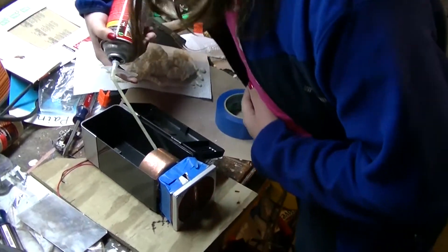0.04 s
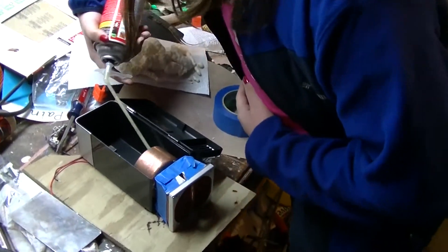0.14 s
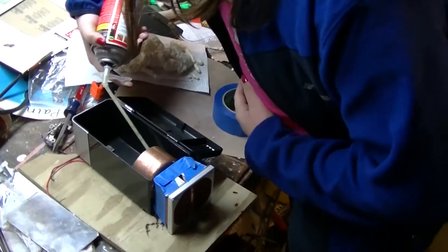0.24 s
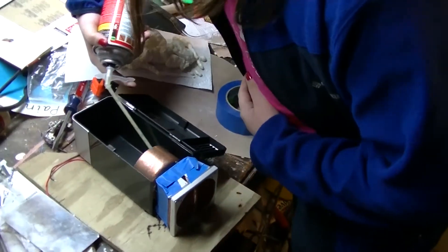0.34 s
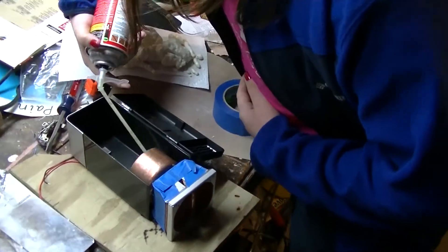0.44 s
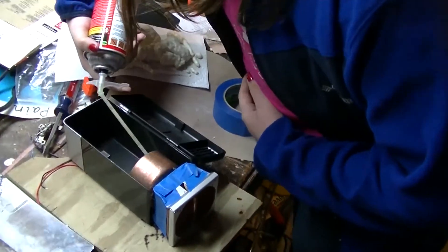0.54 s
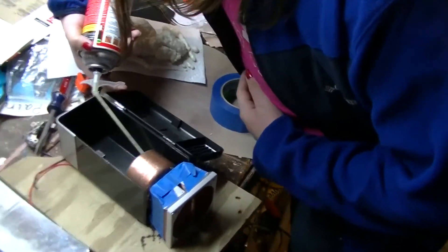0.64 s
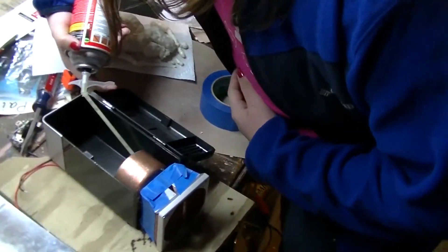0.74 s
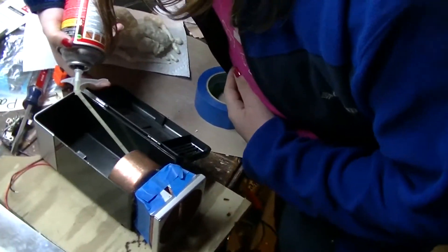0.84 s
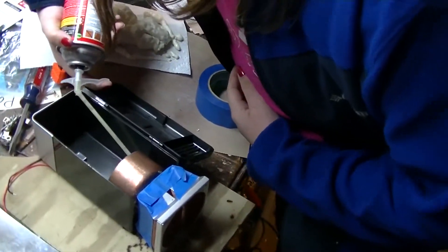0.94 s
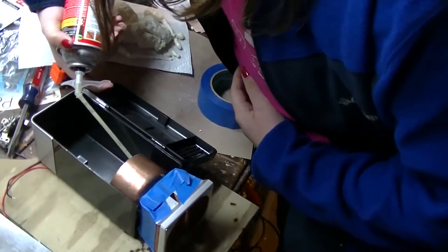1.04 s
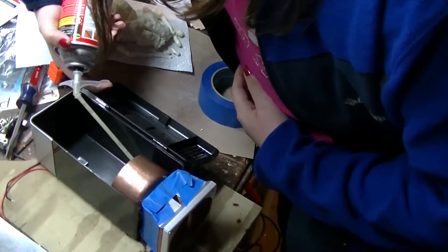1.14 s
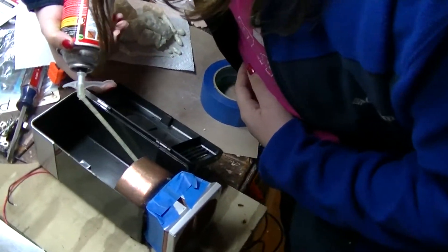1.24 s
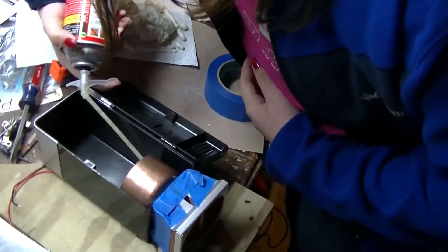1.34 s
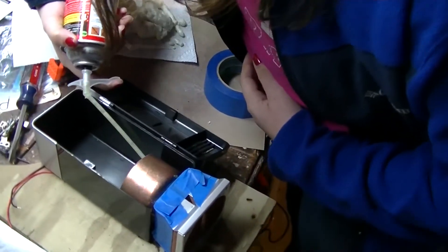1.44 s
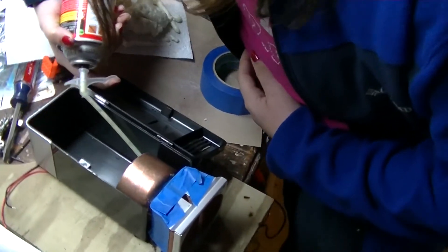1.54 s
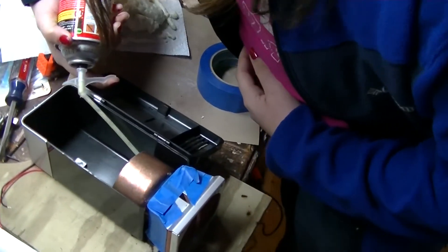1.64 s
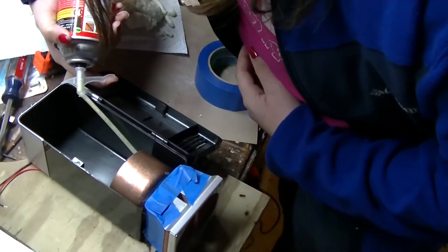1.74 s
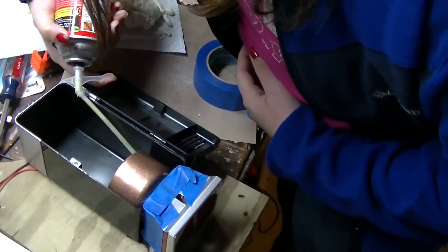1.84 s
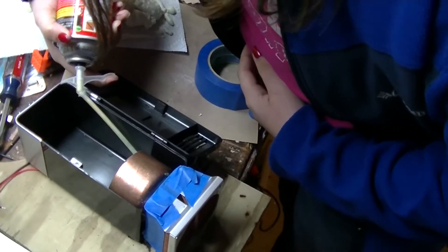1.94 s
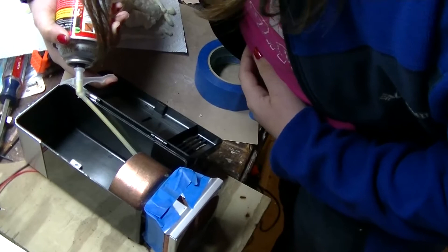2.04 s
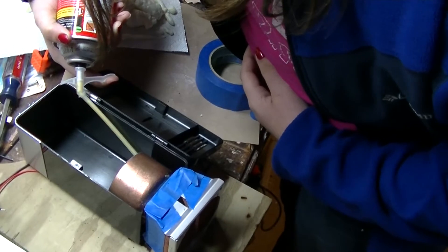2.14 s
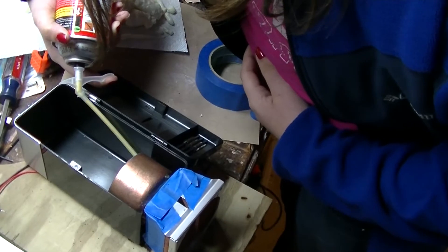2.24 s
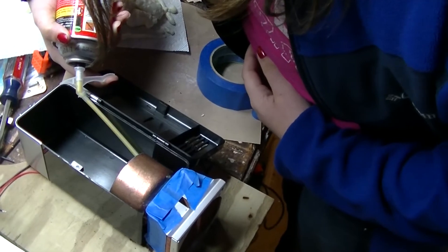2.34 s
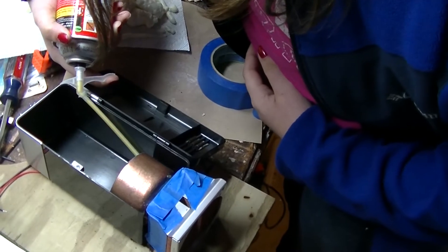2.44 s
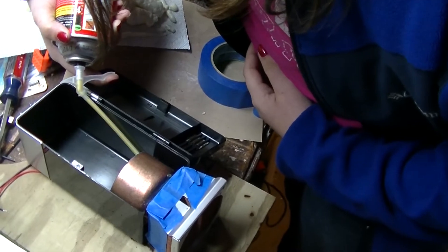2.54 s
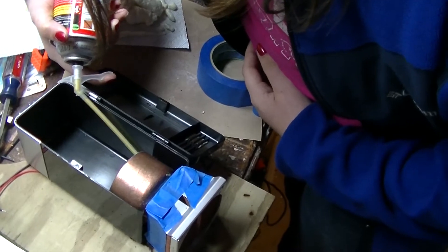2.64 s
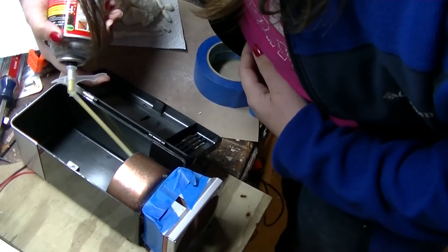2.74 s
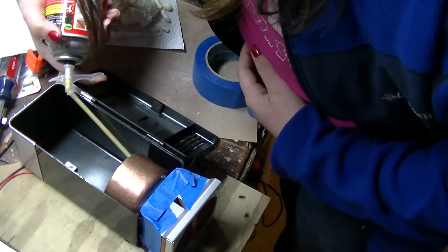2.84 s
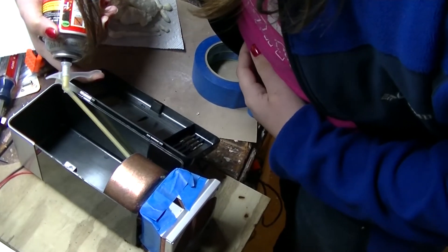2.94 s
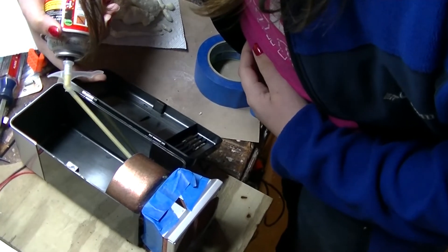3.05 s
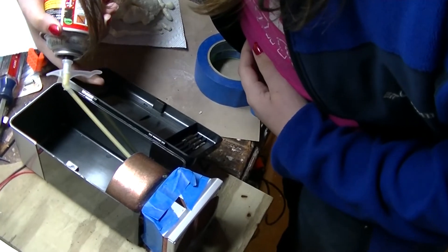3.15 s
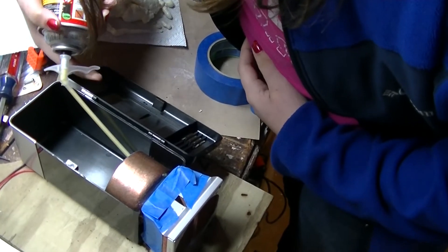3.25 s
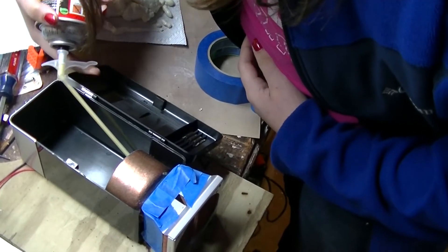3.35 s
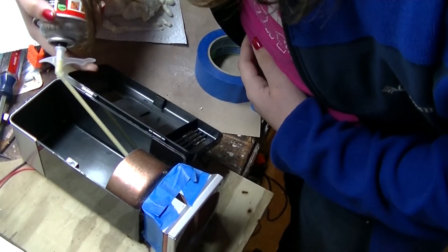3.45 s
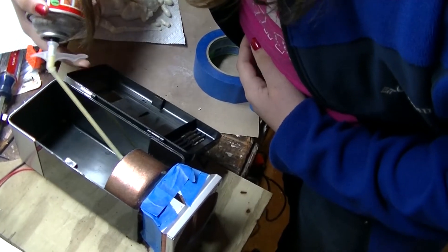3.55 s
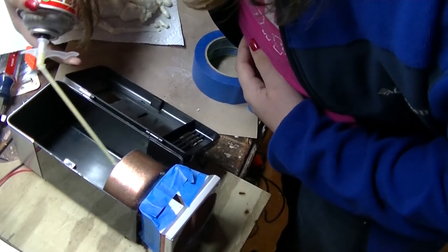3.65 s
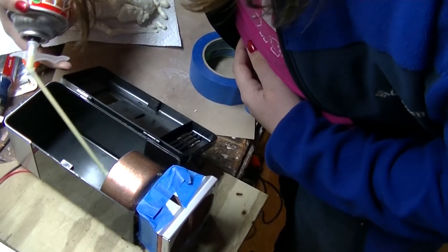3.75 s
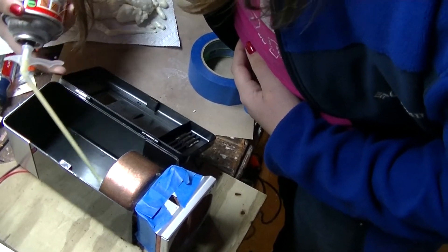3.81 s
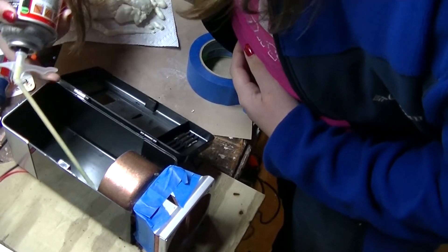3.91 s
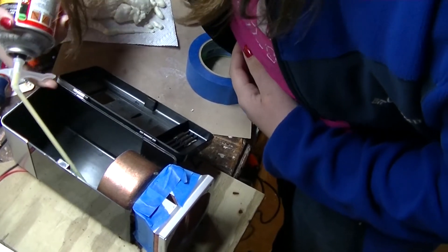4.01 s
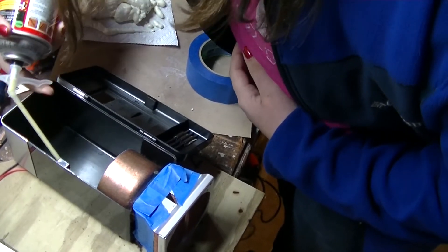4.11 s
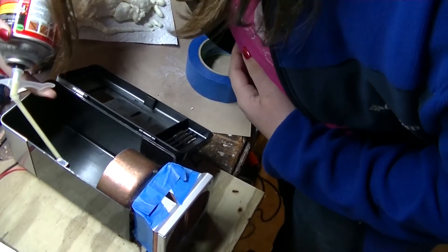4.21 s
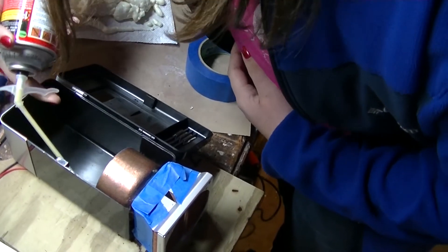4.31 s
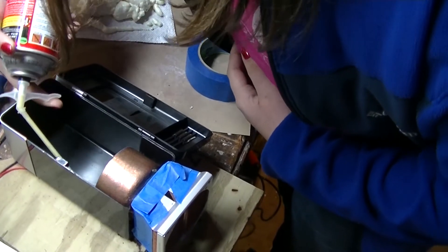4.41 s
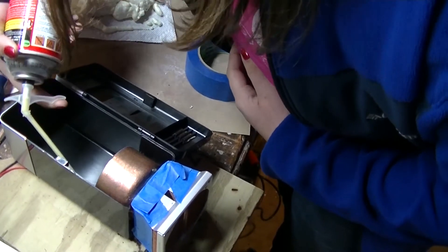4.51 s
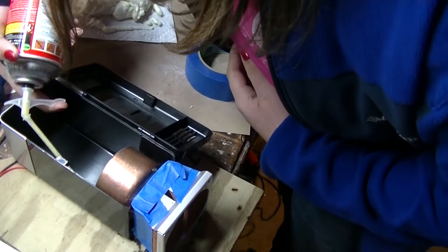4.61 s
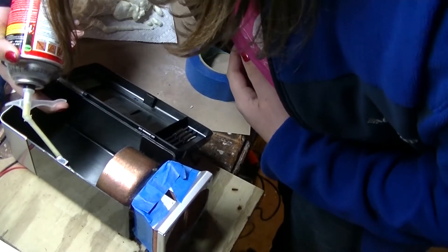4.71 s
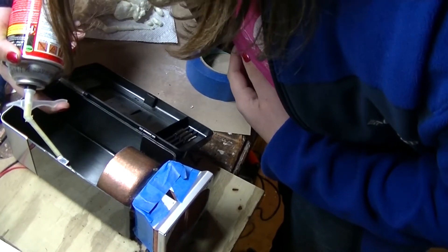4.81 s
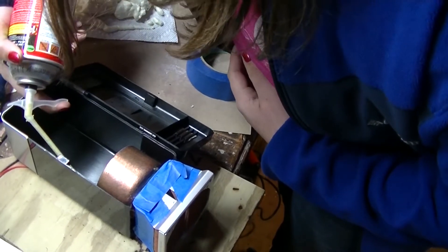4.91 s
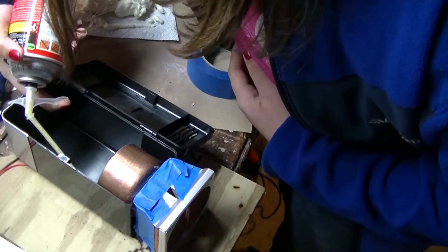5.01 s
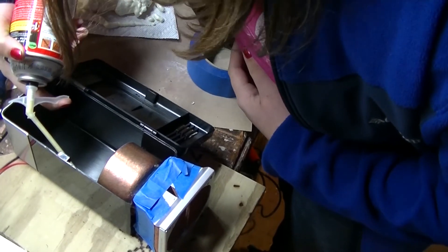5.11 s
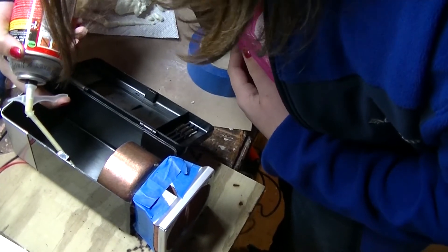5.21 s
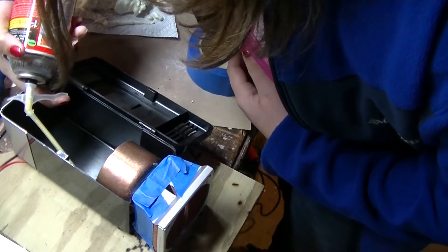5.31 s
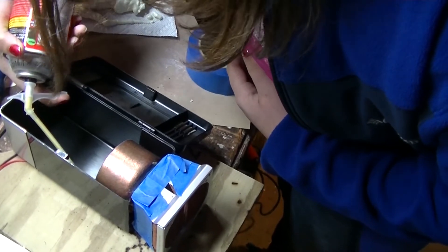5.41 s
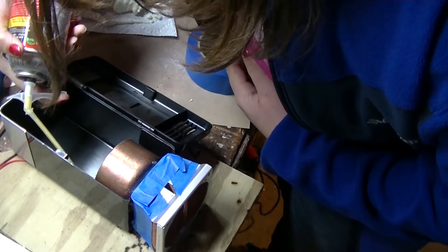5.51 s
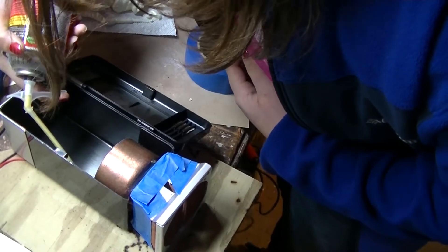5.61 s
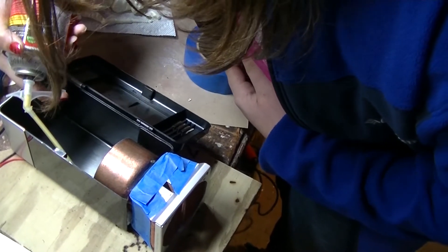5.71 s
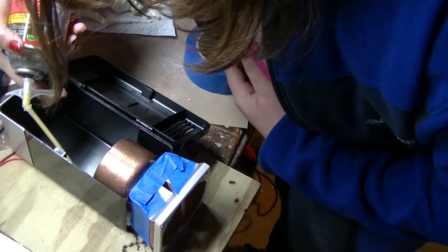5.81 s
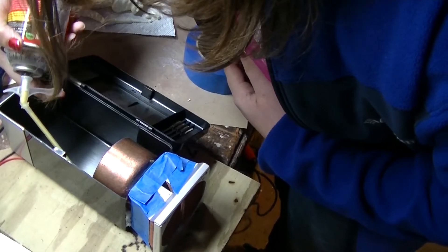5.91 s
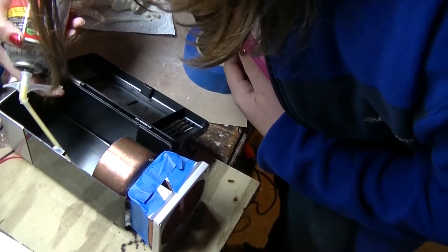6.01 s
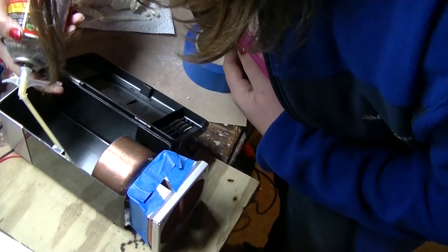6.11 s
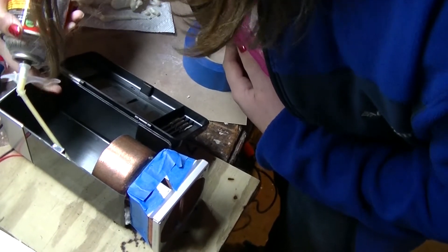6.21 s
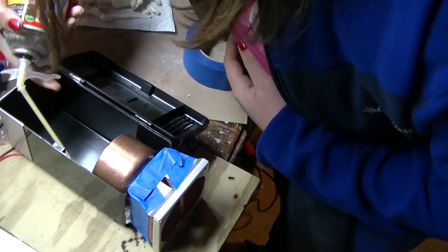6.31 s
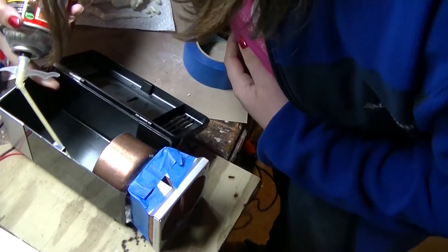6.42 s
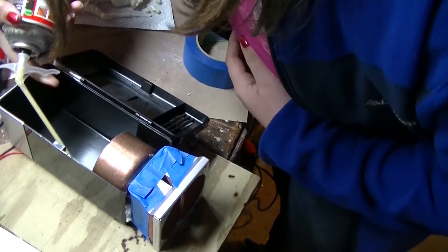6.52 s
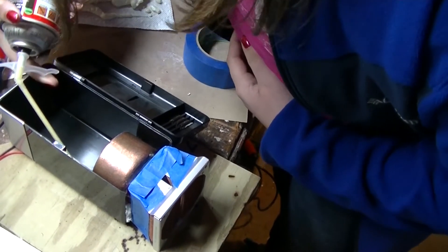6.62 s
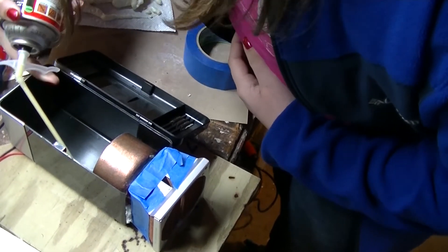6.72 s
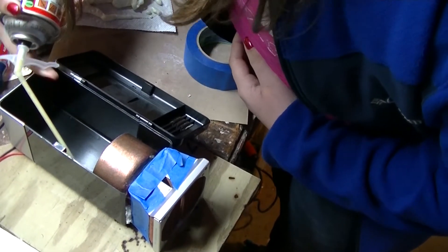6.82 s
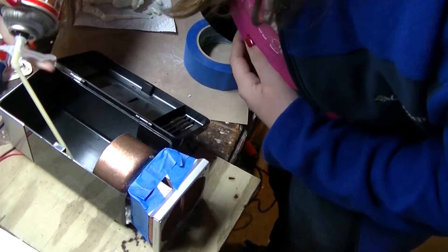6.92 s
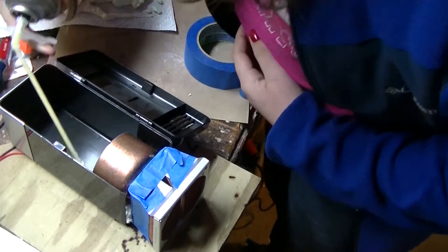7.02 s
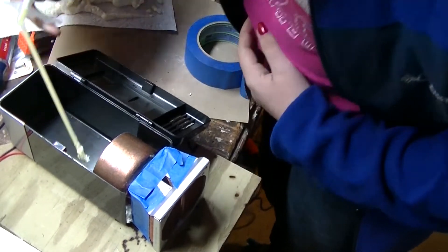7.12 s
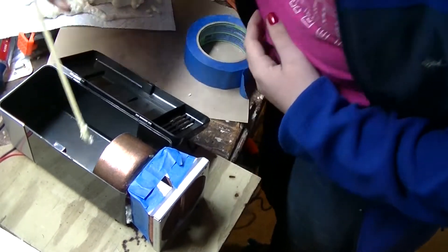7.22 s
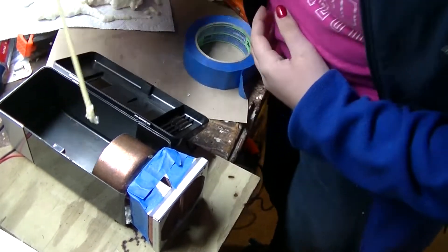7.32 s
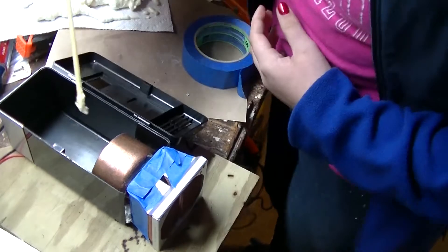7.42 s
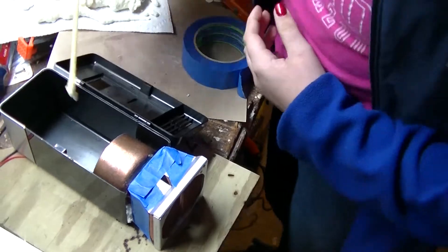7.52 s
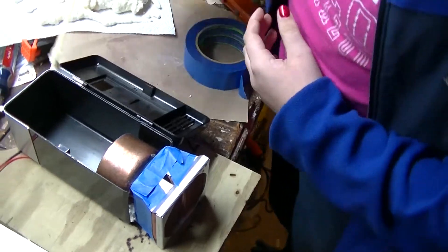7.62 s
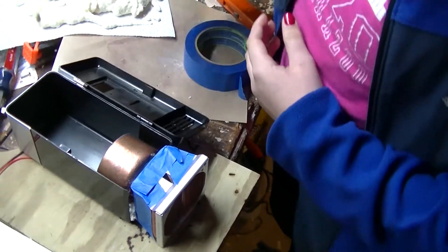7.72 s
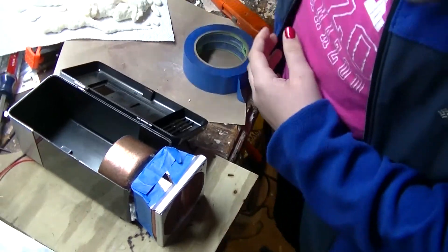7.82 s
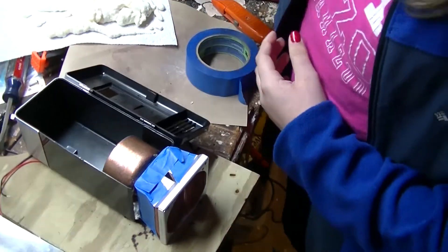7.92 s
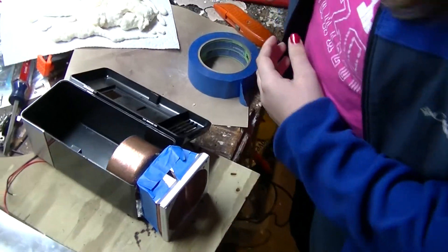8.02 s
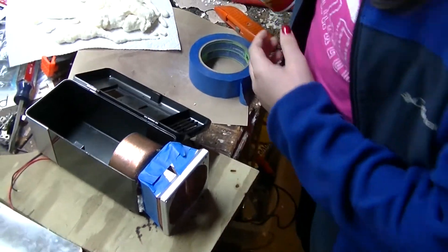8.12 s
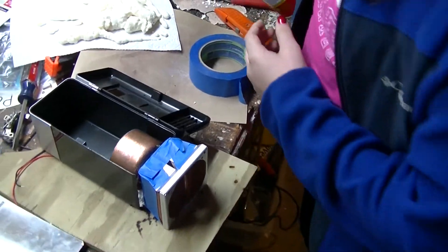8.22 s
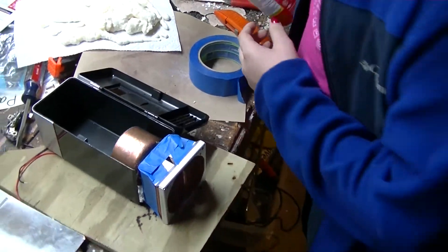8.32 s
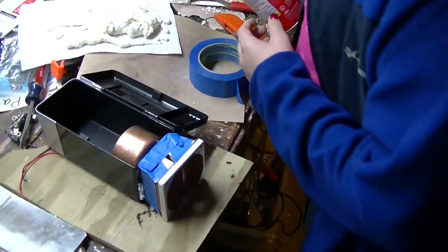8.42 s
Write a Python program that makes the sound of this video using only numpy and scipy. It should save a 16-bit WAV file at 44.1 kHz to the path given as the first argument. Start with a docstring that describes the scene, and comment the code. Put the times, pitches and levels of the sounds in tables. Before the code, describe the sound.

Close at a workbench, a can hisses thinly through a straw, then sputters into a thick, lumpy gush of foam inside an open metal box. After a quiet gap a second, shorter squirt hisses and spits. The straw clicks sharply on the rim, a sleeve rustles and small ticks follow. A hand-held stereo microphone adds faint lens whir, motor ticks, grip bumps and room murmur.

```python
"""Expanding foam is squirted twice from an aerosol can through a straw into an open metal box on a workbench.
Gas hisses first, as coloured noise; then foam spits in short puffs of noise and gushes in a lumpy stream.
The straw clicks on the rim, as ringing tones, a sleeve rustles in clumps of noise and small ticks sound.
A hand-held camera hears it through two ports and adds the whir and ticks of its lens,
bumps of its grip and its own hiss over the murmur of the room."""
import sys
import numpy as np
from scipy import signal
from scipy.fft import rfft, irfft, next_fast_len
from scipy.io import wavfile
from scipy.ndimage import uniform_filter1d

SR = 44100
rng = np.random.default_rng(int(sys.argv[2]) if len(sys.argv) > 2 else 0)


def ratio(d):
    """dB to gain"""
    e = np.asarray(d, float) / 20
    return 10 ** e


def generate_wav(signal):
    """Clip the signal to [-1, 1] and save it as 16-bit WAV at the path in sys.argv[1]."""
    frames = np.transpose(np.atleast_2d(signal))
    scaled = np.clip(frames, -1, 1) * 32767
    pcm = np.round(scaled).astype(np.int16)
    wavfile.write(sys.argv[1], SR, pcm)


N = 372787   # length in samples
SIZE = next_fast_len(N + SR // 4)   # room for filters to ring out
HZ = np.maximum(np.arange(SIZE // 2 + 1) * SR / SIZE, 1)   # frequency grid


def rms_one(x):
    """Scale to unit rms."""
    return x / np.sqrt(np.mean(x ** 2) + 1e-20)


def in_time(rows):
    """Columns of a table joined by straight lines; the level falls silent outside it."""
    s, level_db, *others = np.transpose(rows)
    now = np.arange(N) / SR
    level = ratio(np.interp(now, s, level_db, -140, -140))
    return [level] + [np.interp(now, s, column) for column in others]


def over_hz(points):
    """Columns of a table on the frequency grid, joined along log frequency."""
    hz, *columns = np.transpose(points)
    return [np.interp(np.log(HZ), np.log(hz), column) for column in columns]


def drift(rate):
    """Random wandering of unit rms, with twice `rate` turning points a second."""
    knots = rng.standard_normal(int(N / SR * rate * 2) + 2)
    places = np.linspace(0, len(knots) - 1, N)
    wander = np.interp(places, np.arange(len(knots)), knots)
    return rms_one(uniform_filter1d(wander, size=400))


def bursts(at_s, heights, t60):
    """Envelope of sudden puffs that die away by 60 dB in t60 seconds."""
    out = np.zeros(N)
    for s, height, length in np.broadcast(at_s, heights, t60):
        start = round(s * SR)
        tail = np.arange(min(round(max(length, .002) * SR), N - start))
        rise = np.minimum(tail / 32.3, 1)   # under a millisecond
        out[start:start + len(tail)] += height * rise * ratio(-60 * tail / len(tail))
    return out


def colour(spectrum, rings=(), under_db=0, band_hz=(1, 22050)):
    """Causal (minimum-phase) response of a broad slope plus resonances; white noise gets rms 1 within the band."""
    power = ratio(over_hz(spectrum)[0] + under_db) ** 2
    for hz, width_hz, level_db in rings:
        power += ratio(level_db) ** 2 / (1 + (2 * (HZ - hz) / width_hz) ** 2) ** 1.6
    in_band = (HZ >= band_hz[0]) & (HZ <= band_hz[1])
    power /= np.sum(power[in_band]) / len(HZ)
    # folding the cepstrum forward makes the response start at once
    cepstrum = irfft(np.log(power) / 2, SIZE)
    cepstrum[1:SIZE // 2] *= 2
    cepstrum[SIZE // 2 + 1:] = 0
    return np.exp(rfft(cepstrum))


def modes(table):
    """Response of struck modes; a unit click sets each ringing at its level, neighbours in opposite sense."""
    now = np.arange(SR // 5) / SR
    rings = [ratio(db - 60 * now / t60) * np.sin(2 * np.pi * hz * now) for hz, db, t60 in table]
    return rfft(sum(rings[::2]) - sum(rings[1::2]), SIZE)


# how the two ports hear a direction: f/Hz, left over right level/dB, left's lead/rad, likeness (0-1)
FROM_BOX = [(200, -10, .4, .8), (500, -12, .5, .95), (1000, -9, .8, .98), (1400, -7, .8, .96),
            (2000, -3, .6, .92), (2900, -3, .25, .9), (3400, -3, .45, .88), (4100, -6, .35, .9),
            (4800, -1, .45, .85), (5500, -3, .3, .35), (6200, 6, -.4, .8), (7200, -1, -1.1, .65),
            (8300, -10, -.3, .55), (9600, -9, .1, .65), (11000, -7, .8, .3), (14500, -2, 2.4, .4)]
FROM_HANDS = [(150, -4, .4, .8), (500, -3, .8, .8), (900, 2, .9, .9), (1900, 5, .9, .8), (2500, 4, 1.7, .5),
              (3400, -1, 1.0, .4), (4800, -4, .1, .7), (7000, 1, -.8, .3), (10000, -4, -.1, .3)]
ALL_ROUND = [(60, -12, 13, 0.54), (203, -7, 2.5, 0.091), (508, -3.5, 2, 0.9), (1510, -7, 13, 0.86),
             (2980, -3, 0.8, 0.26), (4800, 0, 1.5, .45), (7000, -1, 1.5, .1), (14000, -1.5, -42, .1)]


def heard(envelope, response, direction, noisy=True):
    """Noise under the envelope (or bare clicks), filtered; ports get shared and own parts; mid level is kept."""
    balance_db, lead, alike = over_hz(direction)
    alike = np.clip(alike, 0, 1) if noisy else 1
    left, right = ratio(balance_db / 2), ratio(-balance_db / 2)
    mid = np.sqrt(left ** 2 + right ** 2 + 2 * alike * left * right * np.cos(lead)) / 2
    source = rng.standard_normal((3, N)) if noisy else np.ones((3, N))
    shared, *own = rfft(envelope * source, SIZE)
    turned = shared * np.exp(np.outer([.5j, -.5j], lead))
    ports = np.sqrt(alike) * turned + np.sqrt(1 - alike) * np.array(own)
    return irfft(ports * [left, right] / mid * response, SIZE)[:, :N]


def tilted(x, extra_db, edge_hz, kind):
    """Raise or lower one end of the spectrum over time."""
    end = signal.sosfiltfilt(signal.butter(2, edge_hz, kind, fs=SR, output="sos"), x)
    return x + (ratio(extra_db) - 1) * end


def patchy(x, spread_db, rate):
    """A source that keeps changing shape: overlapping half-octave bands swell and sink on their own."""
    spectrum = rfft(x, SIZE)
    step = np.clip(2 * np.log2(HZ / 700), 0, 8)
    out = 0
    for k in range(9):
        band = irfft(spectrum * np.maximum(1 - abs(step - k), 0), SIZE)[:, :N]
        out = out + band * rms_one(ratio(spread_db * drift(rate)))
    return out


# colour of the steady background: f/Hz, level/dB
ROOM_COLOUR = [(15, -59), (25, -63), (120, -17.5), (170, -17.5), (263, -3), (301, -6), (405, -9.5),
               (531, -24), (1260, -25), (1400, -23), (1610, -40), (1790, -22), (2280, -20.5), (3720, -17.5),
               (16000, -32)]
ROOM_DB = -63   # level at 200-450 Hz


def room():
    """Murmur of the room air and the camera's own hiss: noise whose level wavers slightly."""
    return heard(ratio(ROOM_DB + 1.0 * drift(18)), colour(ROOM_COLOUR, band_hz=(200, 450)), ALL_ROUND)


# single bumps as the grip shifts on the camera: t/s, level/dB
BUMPS = [(0.302, -47), (0.364, -46), (0.399, -52), (0.419, -48), (0.459, -46), (0.499, -46), (0.559, -48),
         (0.959, -52), (1.009, -47), (1.1, -49), (1.176, -54), (1.199, -46), (1.239, -49), (1.259, -45),
         (3.189, -51), (6.039, -50), (6.549, -52), (7.099, -45), (7.249, -54), (7.37, -44), (7.449, -42.5),
         (7.569, -49), (8.179, -43), (8.259, -51), (8.349, -45), (8.379, -44), (8.419, -46)]
# dull colour of the grip noise: f/Hz, level/dB
GRIP_COLOUR = [(25, -28), (60, -10.5), (130, -1.5), (250, -1.5), (500, -7.5), (1000, -59)]
GRIP_DB, SQUEEZE_DB, SQUEEZE_S = -74, -2, 0.34   # resting rumble; swell of pressure around bumps and its length


def grip():
    """Lumpy low rumble through the camera body that swells around a few dull bumps, each one short push."""
    s, peak_db = np.transpose(BUMPS)
    bumps = bursts(s, ratio(peak_db), 0.011)
    squeeze = ratio(SQUEEZE_DB) * np.sqrt(np.abs(uniform_filter1d(bumps ** 2, round(SQUEEZE_S * SR))))
    lumps = rms_one(ratio(2.0 * drift(25)))
    pressure = np.hypot(ratio(GRIP_DB + 2.0 * drift(2.5)), squeeze) * lumps
    response = colour(GRIP_COLOUR, band_hz=(40, 220))
    rumble = heard(pressure, response, FROM_HANDS)
    return rumble + heard(bumps, 3.3 * response / abs(response).max(), FROM_HANDS, noisy=False)


def rustle(level, spectrum, clump_db, rings=()):
    """Fibres and small parts slip in clumps: noise whose level jumps about."""
    clumps = rms_one(ratio(clump_db * drift(100)))
    return heard(level * clumps, colour(spectrum, rings, band_hz=(1200, 6000)), FROM_HANDS)


# lens whir and faint movement, running throughout: t/s, level/dB (at 1.2-6 kHz)
WHIR = [(0, -57), (.55, -59.5), (.75, -62), (3.8, -64.5), (4.2, -67.5), (4.5, -63), (4.8, -68), (6.3, -60),
        (6.6, -60.5), (6.75, -71.5), (7.0, -63.5), (7.3, -59.5), (8.2, -60.5), (8.46, -60.5)]
# its colour: f/Hz, level/dB
WHIR_COLOUR = [(290, -31.5), (500, -5.5), (985, -6.5), (1870, -3.5), (2430, -3.5), (3930, -3), (4140, -5),
               (5060, -3), (5550, -11.5), (9960, -16), (12000, -36), (15600, -46), (22000, -120)]


def whir():
    """The lens whir and faint movement, made as one soft rustle that rises and falls."""
    return rustle(in_time(WHIR)[0], WHIR_COLOUR, clump_db=2.1)


# firm steps of the lens motor: t/s, level/dB
STEPS = [(0.019, -64), (0.1206, -65), (0.2633, -58), (0.3303, -57), (0.397, -60.5), (0.5881, -63),
         (0.662, -60), (0.722, -67), (3.5213, -48.5), (3.6638, -57), (3.7312, -58), (3.833, -65),
         (3.9998, -55), (6.2232, -46.5), (6.302, -56), (6.6364, -58.5), (7.4255, -47), (7.5035, -57),
         (7.5702, -56.5), (7.6627, -66), (7.7612, -59), (7.8375, -57)]
# spells of faint stepping: start t/s, end t/s, highest level/dB
HUNTING = [(0.289, .53, -66), (3.556, 3.97, -62), (6.262, 6.601, -67)]
# ringing of the camera shell: f/Hz, level/dB, time to fall 60 dB/s
SHELL = [(1440, 0, .016), (1830, -1, .012), (2450, -2, .01), (2900, -5, .02), (3300, -3, .008),
         (3900, -4, .008), (4950, -10, .01)]
STEP_S = .0335   # beat of the faint steps


def lens_steps():
    """Each step is a few milliseconds of rough contact inside the shell; faint ones keep a steady beat."""
    s, peak_db = np.transpose(STEPS)
    contact = bursts(s, ratio(peak_db), 0.022)
    for start_s, end_s, faint_db in HUNTING:
        at_s = np.arange(start_s, end_s, STEP_S)
        heights = ratio(faint_db - 13.0 * rng.random(30)[:len(at_s)])
        contact = np.maximum(contact, bursts(at_s, heights, 0.026))
    no_bass = (1j * HZ / (660.0 + 1j * HZ)) ** 3
    return heard(contact, modes(SHELL) * no_bass, FROM_HANDS)


# small bright ticks at the bench: t/s, level/dB, centre f/Hz
TICKS = [(1.094, -28.5, 4050), (3.281, -26.5, 4270), (4.361, -32, 4570), (4.672, -35.5, 3660),
         (7.047, -30, 6640), (7.084, -37, 4500), (7.0942, -21.5, 6350), (7.321, -36.5, 10500),
         (7.628, -36, 10400), (7.651, -38, 10800), (7.92, -44, 10400), (8.041, -42, 2500),
         (8.119, -24.5, 4440), (8.329, -28.5, 2740), (8.392, -25.5, 4330), (8.405, -30, 2000)]


def ticks():
    """Each tick is a puff of noise around its own pitch, a little stronger on the right."""
    out = np.zeros(N)
    for s, peak_db, hz in TICKS:
        # 4 dB more, as the band filter takes some away
        puff = bursts(0, ratio(peak_db + 4), 0.0078)[:1024] * rng.standard_normal(1024)
        edges = [max(hz - 1500, hz * 0.52), hz + 1500]
        start = round(s * SR)
        band = signal.butter(3, edges, "band", fs=SR, output="sos")
        out[start:start + 1024] += signal.sosfilt(band, puff)
    return out * ratio([[-1.5], [1.5]])


DRAG_S, DRAG_DB, CATCH_S, STROKE_S, RELEASE_S = 7.365, -48.5, 0.0063, .3, 0.22
STROKE_SAG_DB, RELEASE_DB = 5.5, 15   # loss along the stroke; rise at the catch and fall at the release


def drag():
    """Level of the sleeve's stroke: a quick catch, a slow sag and a release."""
    s = DRAG_S + np.cumsum([0, CATCH_S, STROKE_S, RELEASE_S])
    level_db = DRAG_DB - np.cumsum([RELEASE_DB, -RELEASE_DB, STROKE_SAG_DB, RELEASE_DB])
    return in_time(np.transpose([s, level_db]))[0]


# broad colour of the sleeve's stroke: f/Hz, level/dB
DRAG_COLOUR = [(180, -29), (300, 4.5), (690, -21), (844, -4), (1100, -10.5), (1470, -4.5), (2690, -9),
               (3890, -6), (7320, -20), (10800, -26), (12000, -32), (15600, -62), (22000, -120)]
# the stroke sets the board under it singing: f/Hz, width f/Hz, level/dB
DRAG_RINGS = [(870, 63, -6), (1170, 23, -6), (1920, 210, -1.5), (2850, 81, -11), (3930, 270, -5),
              (5730, 23, -4)]
DRAG_TREBLE_DB, DRAG_BRIGHTENS_DB = -4.5, 7   # at the catch; gain by the end of the stroke


def sleeve():
    """The stroke starts dull and brightens as it gathers speed."""
    along = np.clip((np.arange(N) / SR - DRAG_S) / STROKE_S, 0, 1)
    cloth = rustle(drag(), DRAG_COLOUR, clump_db=2.0, rings=DRAG_RINGS)
    stroke = patchy(cloth, spread_db=1.0, rate=21.0)
    return tilted(stroke, DRAG_TREBLE_DB + DRAG_BRIGHTENS_DB * along, 2400, "high")


# straw against the rim of the box: t/s, first click level/dB, loss per rebound/dB
KNOCKS = [(7.1006, -24, 2.5), (7.372, -46, 22)]
# ringing of the box: f/Hz, level/dB, time to fall 60 dB/s
BOX = [(377, 5.5, 0.012), (820, -8, 0.088), (1380, -5.5, 0.015), (1810, 2.5, 0.015), (2190, 2, 0.017),
       (3080, 2, 0.019), (3550, 5, 0.0084), (4100, 5, 0.012), (4800, 3, 0.0051), (5300, -3, 0.0092),
       (5840, 2, 0.0065), (7160, -19, 0.0071), (9500, -8, 0.0041)]
REBOUND_S, REBOUND_SLOWS = 0.000794, 1.35   # first gap; each next gap is this many times longer


def knocks():
    """A hard touch and three quick rebounds set every mode of the box ringing."""
    after_s = REBOUND_S * np.cumsum([0, 1, REBOUND_SLOWS, REBOUND_SLOWS ** 2])
    clicks = np.zeros(N)
    for s, peak_db, loss_db in KNOCKS:
        clicks[np.round((s + after_s) * SR).astype(int)] = ratio(peak_db - loss_db * np.arange(4))
    no_bass = (1j * HZ / (220.0 + 1j * HZ)) ** 2
    return heard(clicks, modes(BOX) * no_bass, FROM_HANDS, noisy=False)


# the clearest spits of foam: t/s, level/dB
SPITS = [(1.844, -39), (1.954, -37.5), (2.0014, -40), (2.086, -34), (2.2084, -38), (2.2557, -26),
         (2.2418, -29), (2.275, -29.5), (2.2977, -30.5), (2.3405, -25.5), (2.3632, -30.5), (2.4152, -28.5),
         (2.436, -26.5), (2.468, -24.5), (2.4837, -31), (2.5083, -19), (2.5223, -24), (2.539, -16.5),
         (2.5695, -17), (2.597, -19), (2.692, -19.5), (5.3779, -24.5), (5.47, -34), (5.5162, -25),
         (5.5494, -29), (5.5726, -30), (5.5876, -21), (5.6102, -29), (5.6404, -24), (5.686, -24),
         (5.706, -23.5), (5.7295, -19.5), (5.7954, -17.5), (5.827, -29), (5.9943, -22.5), (6.0463, -30),
         (6.079, -41)]
# smaller random spits, a row for each squirt: start t/s, end t/s, highest level/dB
SPUTTER = [(2.1, 2.42, -32), (5.38, 5.5, -41)]
SPUTTER_PER_S, SPIT_T60_S = 45.0, 0.021


def spits(squirt):
    """Envelope of the clear spits of one squirt and freshly drawn small ones at chance moments."""
    s, peak_db = np.transpose([row for row in SPITS if (row[0] > 4) == squirt])
    clear = bursts(s, ratio(peak_db), SPIT_T60_S)
    start_s, end_s, small_db = SPUTTER[squirt]
    gap, size = rng.random((40, 2)).T
    at_s = start_s - np.cumsum(np.log(gap)) / SPUTTER_PER_S
    heights = ratio(small_db - 6.0 * size)
    small = bursts(at_s[at_s < end_s], heights[at_s < end_s], SPIT_T60_S)
    return np.maximum(clear, small)


# propellant gas through the straw, one table a squirt: t/s, level/dB (at 3.5-7 kHz)
GAS = [
    [(1.07, -69), (1.11, -57.5), (1.25, -52.5), (1.32, -47.5), (1.48, -43.5), (1.65, -45.5), (1.95, -38.5),
     (2.4, -50), (2.56, -36), (3.02, -40.5), (3.14, -58.5), (3.3, -63), (3.62, -69)],
    [(4.84, -78), (4.9, -47.5), (4.96, -44), (5.1, -37), (5.36, -39), (5.62, -52), (5.75, -36.5),
     (5.87, -40), (6.05, -43.5), (6.2, -61), (6.35, -71)],
]
# broad colour of the gas, one table a squirt: f/Hz, level/dB
GAS_COLOUR = [
    [(710, -25), (1200, -19), (2210, -6.5), (2710, -5), (4200, 7.5), (5610, -1.5), (6310, -2.5),
     (7170, -7.5), (15500, -35)],
    [(710, -66), (1200, -28), (3050, -9.5), (3980, 6), (4670, 1.5), (5610, -3.5), (6110, -4), (9990, -23.5),
     (15500, -35)],
]
# resonances of straw and box on it, one table a squirt: f/Hz, width f/Hz, level/dB
GAS_RINGS = [
    [(2400, 300, -5), (3400, 250, -7), (4200, 350, 0), (4900, 300, -6), (6150, 300, -1), (8050, 400, -16),
     (11900, 700, -29), (9700, 900, -21)],
    [(2800, 250, -10), (3430, 200, -2), (3910, 400, 0), (4610, 250, 0), (6180, 400, -9), (7340, 400, -14),
     (8460, 400, -15), (10000, 1200, -20)],
]
# the jet brightens while foam climbs the straw, until the gush; a row for each squirt:
# gush t/s, starting treble level/dB, rise/(dB/s), treble level after/dB
BRIGHTENS = [(2.44, 0, 4.5, -0.5), (5.56, -4, 25.5, -4.5)]
TREBLE_KEEPS = 0.78   # share of each sag in the jet that its treble, straight from the valve, does not follow
SPIT_GAS_DB = -5.5   # puffs of gas against the spits


def gas(squirt):
    """A turbulent jet that flutters as droplets pass the valve; spits free puffs of gas."""
    level, = in_time(GAS[squirt])
    gush_s, start_db, db_per_s, after_db = BRIGHTENS[squirt]
    now = np.arange(N) / SR
    sag_db = 20 * np.log10(np.maximum.accumulate(level) / level)   # below the loudest so far
    rising_db = start_db + db_per_s * (now - GAS[squirt][0][0])
    treble_db = np.where(now < gush_s, rising_db, after_db) + TREBLE_KEEPS * sag_db
    treble_db = uniform_filter1d(np.clip(treble_db, -12, 28.0), size=2000)
    flutter = ratio(0.31 * drift(12) + 0.33 * drift(60) + 1.33 * drift(320))
    jet = np.hypot(level * rms_one(flutter), ratio(SPIT_GAS_DB) * spits(squirt))
    response = colour(GAS_COLOUR[squirt], GAS_RINGS[squirt], under_db=-6.5, band_hz=(3500, 7000))
    return tilted(heard(jet, response, FROM_BOX), treble_db, 9050, "high")


# foam leaving the tip, one table a squirt: t/s, level/dB (at 1.2-3 kHz)
FOAM = [
    [(1.5, -58), (1.95, -56.5), (2.3, -42), (2.41, -49.5), (2.5, -38.5), (2.55, -29.5), (2.66, -21.5),
     (2.76, -26), (2.87, -30), (3.05, -47), (3.14, -63), (3.3, -74)],
    [(5.1, -60), (5.38, -48.5), (5.6, -48.5), (5.66, -35), (5.72, -36), (5.79, -27), (5.88, -30.5),
     (6.06, -35.5), (6.12, -45.5), (6.28, -71)],
]
# broad colour of the foam, one table a squirt: f/Hz, level/dB
FOAM_COLOUR = [
    [(120, -65), (200, -40), (334, -21), (709, -12), (916, -7.5), (1100, -13), (1450, -2.5), (2210, 1.5),
     (4950, -16), (10100, -53), (16000, -64)],
    [(120, -47), (200, -25), (401, -7.5), (500, -11.5), (950, -1.5), (1100, -11), (1270, -4.5), (1980, -11),
     (3490, 1), (10100, -35.5), (16000, -58)],
]
# resonances of straw and box on it, one table a squirt: f/Hz, width f/Hz, level/dB
FOAM_RINGS = [
    [(358, 90, -18), (934, 120, -11.5), (1390, 62, -7.5), (1910, 190, -9.5), (2280, 130, -10),
     (2932, 170, -1.5), (3180, 130, -10), (4000, 160, -17), (5090, 220, -15), (6140, 240, -29)],
    [(349, 82, -8), (947, 73, -10), (1324, 49, -9), (1700, 190, -10.5), (2200, 93, -4), (2595, 530, -2.5),
     (3040, 120, -13), (3590, 83, -9), (5000, 330, -10.5), (6000, 280, -16), (9860, 370, -26)],
]
# the low gurgle of the gush follows it late, a row for each squirt: lag t/s, level/dB
GURGLE = [(0.18, -2.5), (0.093, -5.5)]
# air in the box, pushed by spits: pitch, width, gain at that pitch and length of each push
BOOM_HZ, BOOM_WIDTH_HZ, BOOM_DB, BOOM_S = 338, 136, 13, 0.057


def foam(squirt, per_s=85.0, t60=0.052, lumpy=0.18):
    """Gas pockets burst at the tip in uneven succession over a steady gush; spits push the air in the box."""
    level, = in_time(FOAM[squirt])
    lag_s, gurgle_db = GURGLE[squirt]
    late = uniform_filter1d(np.roll(level, round(lag_s * SR)), size=8000)
    bass_db = np.clip(gurgle_db + 20 * np.log10(late / level), -12.0, 27.0)

    at_s = np.cumsum(rng.gamma(3.0, 1 / 3.0, 2000) / per_s)
    at_s = at_s[at_s < N / SR - .1]
    heights = ratio(2.0 * rng.standard_normal(2000)[:len(at_s)])
    pockets = rms_one(bursts(at_s, heights, t60))
    flow = level * np.sqrt(1 - lumpy + lumpy * pockets ** 2) * rms_one(ratio(2.0 * drift(250)))
    response = colour(FOAM_COLOUR[squirt], FOAM_RINGS[squirt], under_db=-5.5, band_hz=(1200, 3000))
    gush = tilted(heard(flow, response, FROM_BOX), bass_db, 1070, "low")

    thin = HZ ** 2 / (HZ ** 2 + 880.0 ** 2)   # a single spit moves little air: weak bass
    puffs = spits(squirt)
    boom = ratio(BOOM_DB) / (1 + 1j * (HZ / BOOM_HZ - BOOM_HZ / HZ) * BOOM_HZ / BOOM_WIDTH_HZ) ** 2
    pushed = uniform_filter1d(puffs * (bass_db > -6.0), round(BOOM_S * SR))   # only while the gurgle is up
    return gush + heard(puffs, response * thin, FROM_BOX) + heard(pushed, boom, FROM_BOX)


BOX_ECHO_T60_S, BOX_ECHO_DB = .12, -6   # sound bouncing inside the open box; its level against the direct sound


def in_box(x):
    """Dense early echoes between the metal walls leave a fine comb of resonances, weaker in the bass."""
    now = np.arange(SR // 4) / SR
    echoes = rng.standard_normal(len(now)) * ratio(-60 * now / BOX_ECHO_T60_S) * (now > .001)
    echoes = echoes / np.sqrt(np.sum(echoes ** 2))
    share = ratio(BOX_ECHO_DB) * HZ ** 2 / (HZ ** 2 + 1200.0 ** 2)
    response = (1 + share * rfft(echoes, SIZE)) / np.sqrt(1 + share ** 2)
    return irfft(rfft(x, SIZE) * response, SIZE)[:, :N]


def scene():
    """Background, camera noises and handling, with both squirts of the can sounding inside the box."""
    background = room() + grip() + whir() + lens_steps()
    handling = ticks() + sleeve() + knocks()
    hiss = patchy(gas(0) + gas(1), spread_db=1.4, rate=30.0)
    spatter = patchy(foam(0) + foam(1), spread_db=1.63, rate=38.0)
    return background + handling + in_box(hiss + spatter)


def top_cut(x):
    """Nothing passes above the cut-off."""
    return signal.sosfilt(signal.butter(12, 16340, fs=SR, output="sos"), x)


def record(dry):
    """The camera body weakens a narrow band near 1.1 kHz; deep bass is rolled off and the top cut steeply."""
    notch = 1 - 0.27 / (1 + 2j * (HZ - 1090) / 160)
    bass = (1j * HZ / (13.7 + 1j * HZ)) ** 2
    top = 1 / (1 + (HZ / 15750) ** 200)
    mix = irfft(rfft(dry, SIZE) * notch * bass * top, SIZE)[:, :N]
    return top_cut(mix)


dry = scene()
out = record(dry)
generate_wav(out)
```